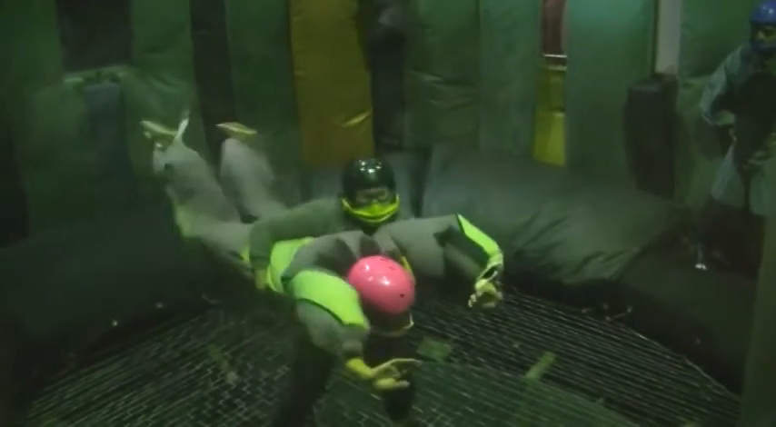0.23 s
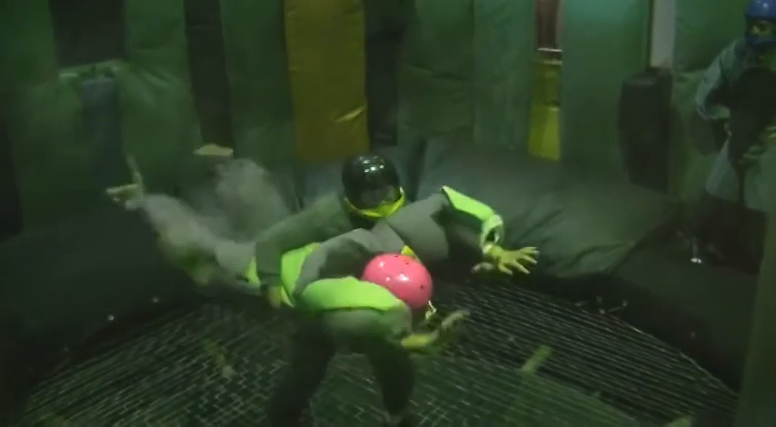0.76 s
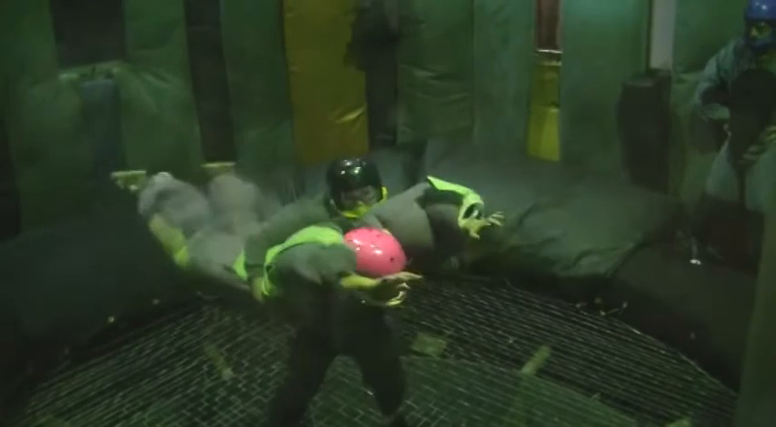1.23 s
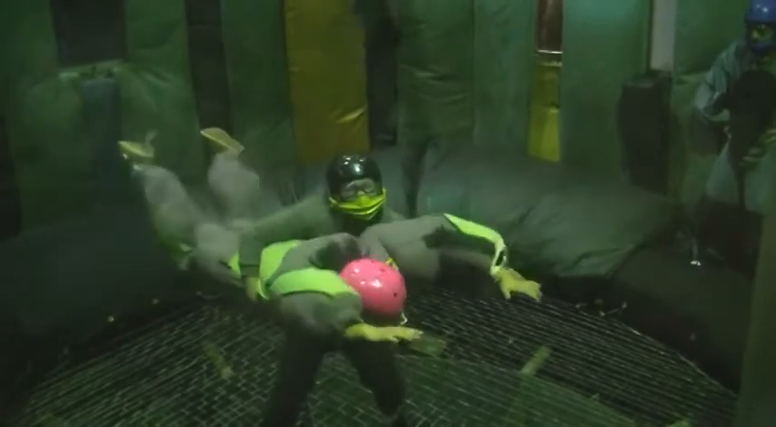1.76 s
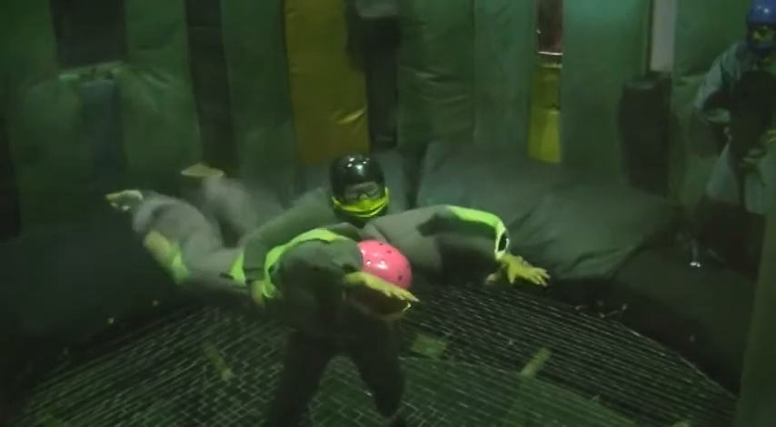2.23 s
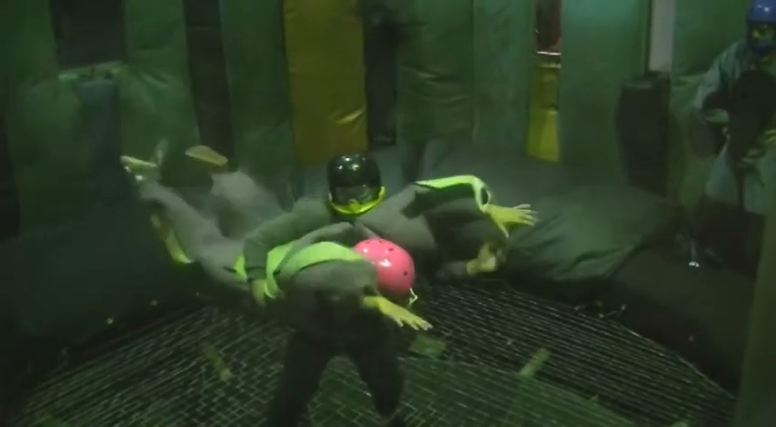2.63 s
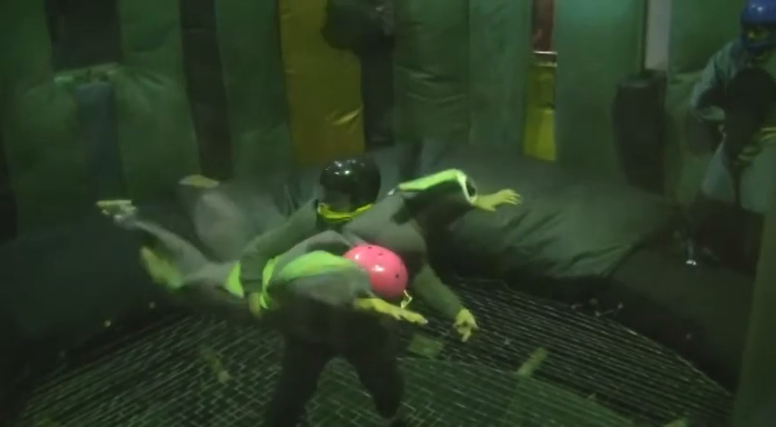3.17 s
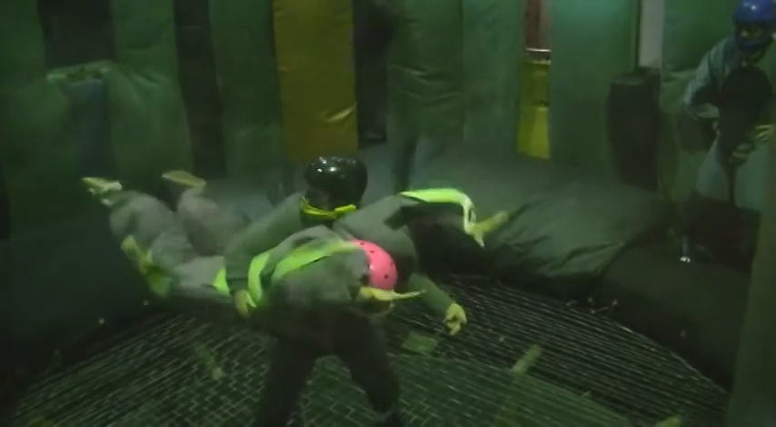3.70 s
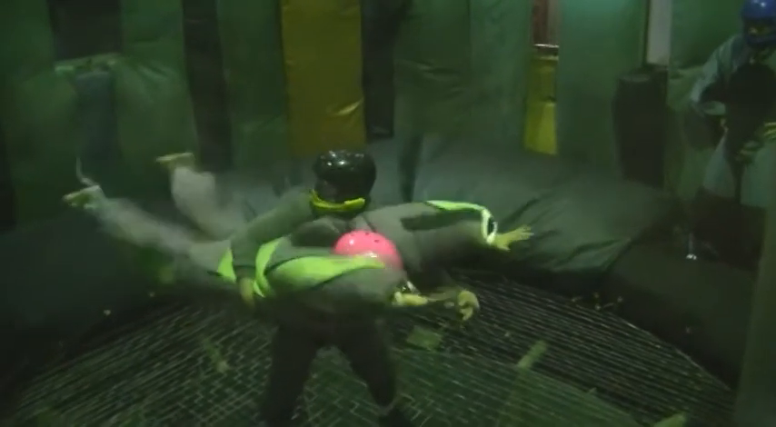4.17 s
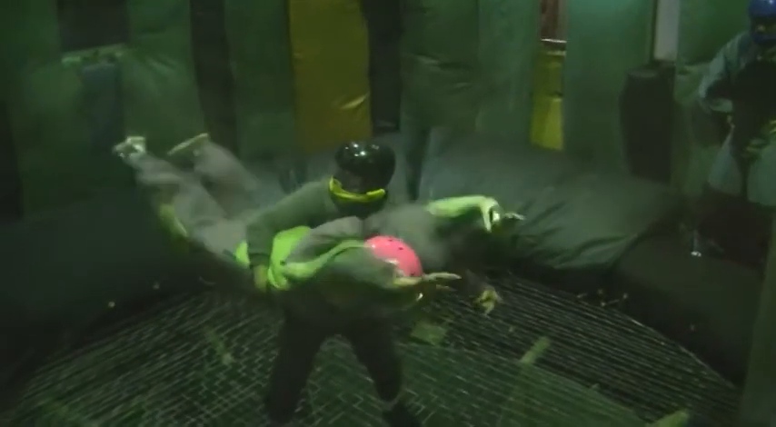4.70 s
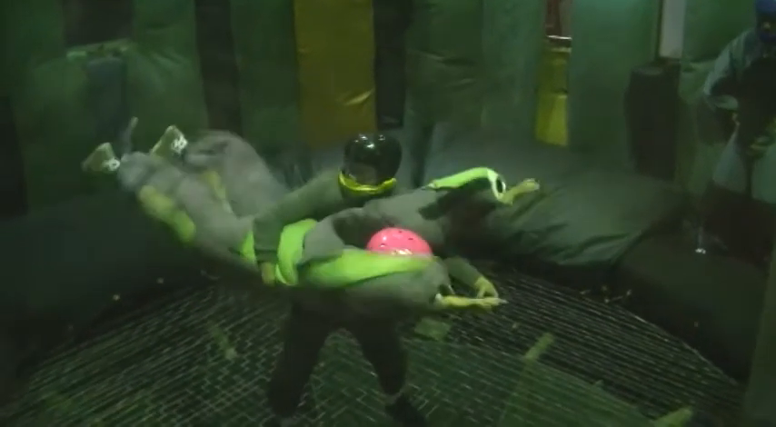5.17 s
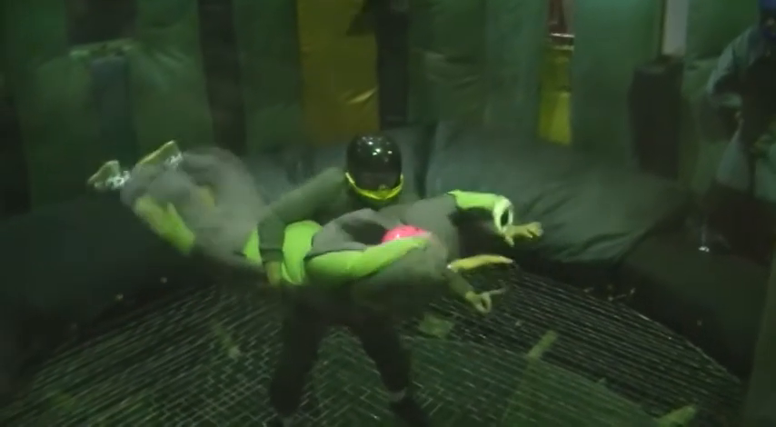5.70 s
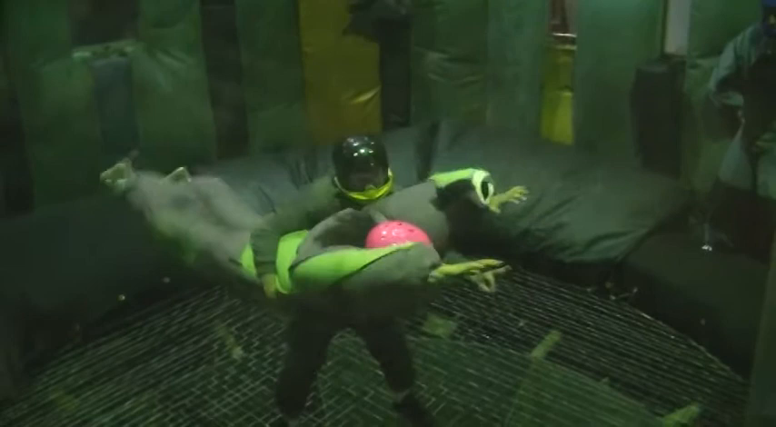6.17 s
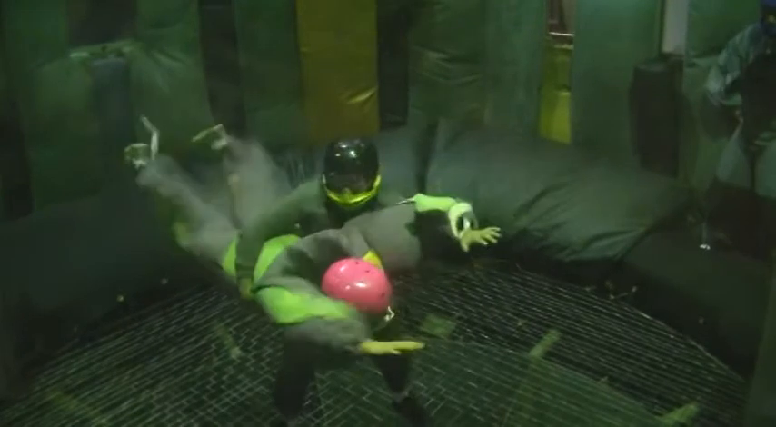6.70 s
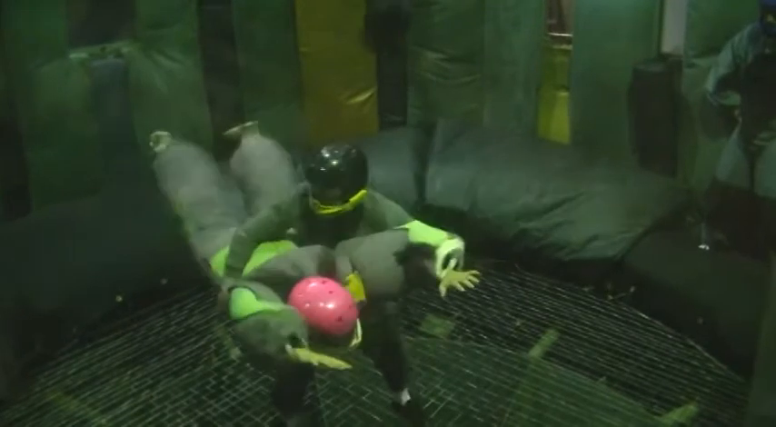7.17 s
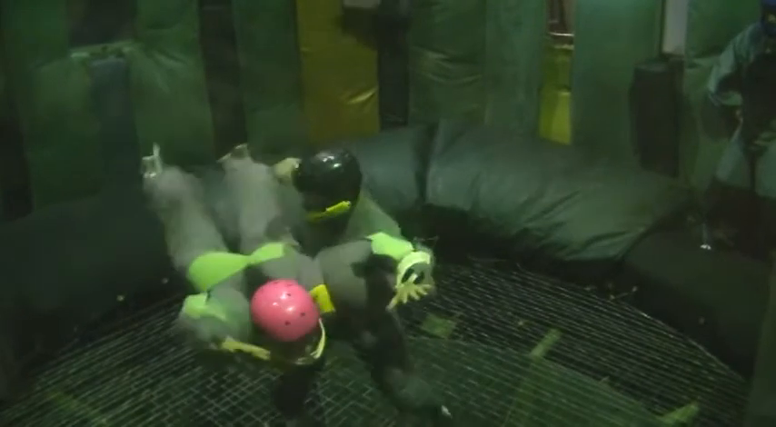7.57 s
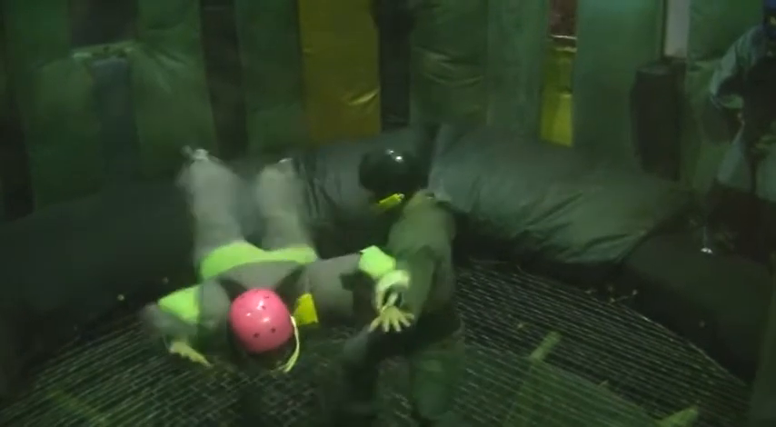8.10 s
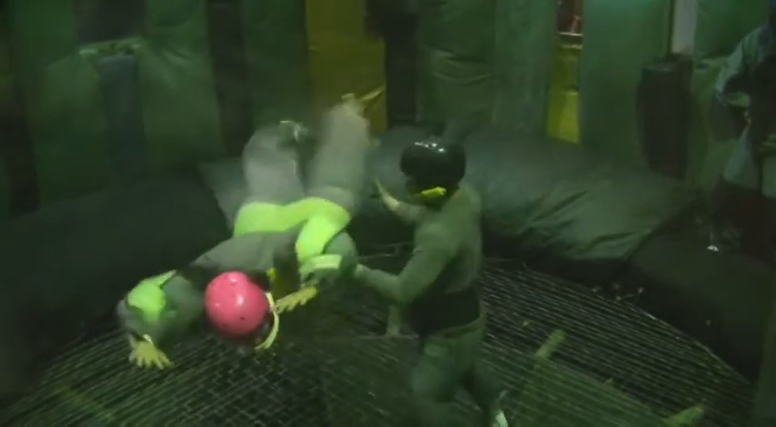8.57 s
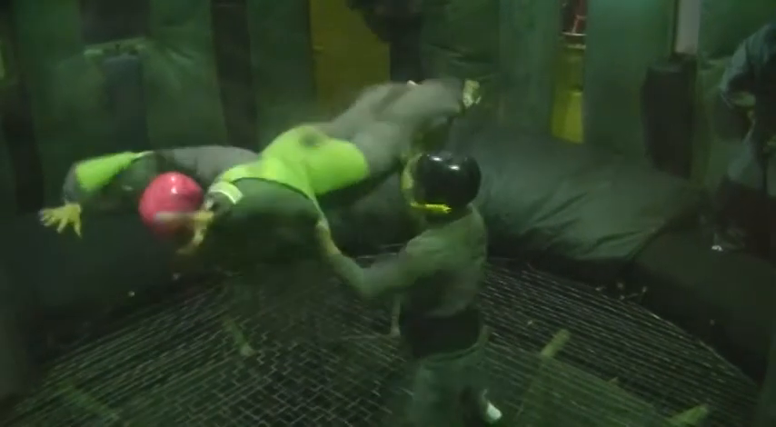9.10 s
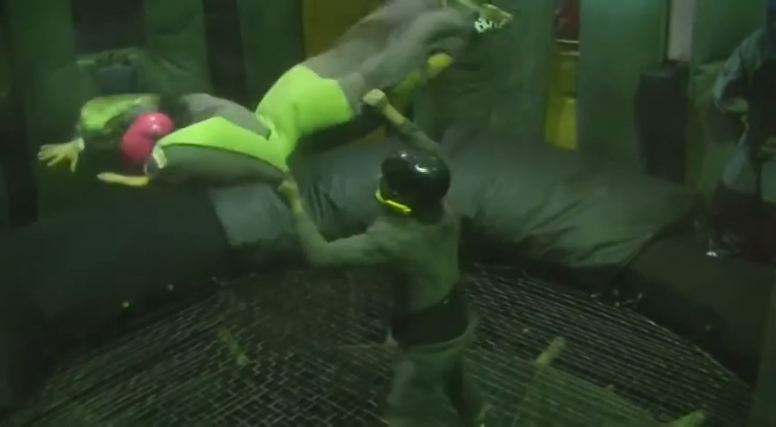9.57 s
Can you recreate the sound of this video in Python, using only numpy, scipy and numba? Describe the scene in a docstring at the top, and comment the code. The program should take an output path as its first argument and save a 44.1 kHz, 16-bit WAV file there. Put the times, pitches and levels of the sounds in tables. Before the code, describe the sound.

From 0 to about 10 seconds, the inside of a vertical wind tunnel is filled with an unbroken loud rush of air. A big fan gives a low, rough hum of several close harmonics, around 130 to 220 hertz strongest, that beat and waver irregularly several times a second over a faint deep drone. Around it a broad low roar, strongest from 200 to 500 hertz, surges and sags quickly, with hollow shaft resonances. A much softer hiss flutters above, rising slightly near 0, 3.5, 5.5, 7.3 and 8.6 seconds. One upper hum tone swells most around 5.6 seconds; roar and resonance thicken a little near 9, as the flyer is lifted. The sound is close, dense, compressed, nearly centred and dark, with little high treble. There are no voices, impacts or pauses, and it ends abruptly while still blowing.

```python
"""A big fan hums and throbs inside a vertical wind tunnel, driving a steady blast up through the floor net.
Its blade tones are harmonics of one rate, each partly scattered by eddies in the turbulent duct.
Noise keeps the shaft's air resonances ringing, roars low in surges, and hisses past the net and the flyers' suits.
A fast gain control turns the whole mix down as its power rises, so a swelling hum ducks the hiss."""
import sys
import numpy as np
from scipy import signal
from scipy.fft import rfft, irfft, next_fast_len
from scipy.io import wavfile
from numba import njit

SR = 44100
rng = np.random.default_rng(int(sys.argv[2]) if len(sys.argv) > 2 else 0)


def dump(signal):
    """Clip the signal to [-1, 1] and save it as 16-bit WAV at the path in sys.argv[1]."""
    limited = np.clip(np.atleast_2d(signal).T, -1, 1)
    pcm = np.round(limited * 32767).astype(np.int16)
    wavfile.write(sys.argv[1], SR, pcm)


N = 434385

TIME = np.arange(N) / SR
FREQS = np.fft.rfftfreq(next_fast_len(N), 1 / SR)
BLADE_HZ = 44.69  # blades passing per second


def fan():
    """The whole hum: a deep drone, three strong throbbing harmonics and the weaker blade tones around them."""
    third = fan_throb(index=1, level_db=0.0, share=0.05, scatter_hz=8.2, shift_hz=-1.5, wander=0.32, wander_hz=1.3)
    fourth = fan_throb(index=2, level_db=-0.35, share=0.09, scatter_hz=6.2, shift_hz=4.5, wander=0.6, wander_hz=1.1)
    fifth = fan_throb(index=3, level_db=0.0, share=0.087, scatter_hz=4.0, shift_hz=1.5, wander=1.21, wander_hz=1.2)
    return fan_drone() + fan_hum() + third + fourth + fifth


def fan_throb(index, level_db, share, scatter_hz, shift_hz, wander, wander_hz):
    """A strong blade tone: it swells slowly, eddies scatter a share of it, and its phase wanders (rms radians)."""
    # slow swells of the strongest harmonics, before the trim level_db:
    # (time [s], 3rd level [dB], 4th level [dB], 5th level [dB])
    throb = [(0.0, -18.5, -21, -19), (0.6, -24, -21, -21.5), (1.35, -19.5, -19, -21),
             (1.95, -21.5, -20.5, -19), (2.25, -24, -17.5, -17.5), (2.6, -21.5, -20, -18.5),
             (3.2, -22.5, -19, -20.5), (3.7, -22.5, -19, -26.5), (4.3, -20, -20, -19.5),
             (4.85, -19.5, -22.5, -22.5), (5.15, -21, -21, -23.5), (5.6, -28.5, -18.5, -13),
             (6.2, -22.5, -20, -28), (6.8, -20.5, -20, -18.5), (7.45, -19, -21, -27),
             (8.4, -24.5, -20.5, -17.5), (9.0, -21, -16, -19), (9.85, -27, -19, -22)]
    multiple = index + 2
    phase = wander * eddies(wander_hz)
    level = gain_of(curve(throb, index) + swells(multiple) + level_db)
    amplitude = scattered(share, scatter_hz, shift_hz) * np.exp(1j * phase)
    return level * blade_tone(multiple, amplitude)


def fan_drone(level_db=0.0):
    """The fundamental of the blade rate, a nearly pure tone."""
    # slow level of the deep fundamental: (time [s], level [dB])
    drone = [(0.0, -38), (0.39, -32.5), (1.62, -33.5), (1.82, -31), (3.84, -30.5), (4.97, -35),
             (8.13, -34.0), (9.31, -40), (9.85, -29.5)]
    level = gain_of(curve(drone, index=1) + level_db)
    return level * blade_tone(1, scattered(0.03, rate_hz=3.0))


def fan_hum():
    """The weaker blade tones, blurred by the turbulent air they cross."""
    # weaker harmonics, before their brief swells:
    # (multiple of the blade rate, level [dB], share scattered by turbulence [0-1], shift of that share [Hz])
    blade_tones = [(2, -34.5, .15, 0), (6, -25, 0.37, -1.2), (7, -25.5, 0.46, -1.2), (8, -30, .38, 0.6),
                   (9, -38.5, 0.6, 0), (10, -36, 0.8, 0), (12, -38, .9, 2)]
    hum = 0
    for multiple, db, share, shift_hz in blade_tones:
        level = gain_of(db + swells(multiple))
        hum = hum + level * blade_tone(multiple, scattered(share, rate_hz=5.0, shift_hz=shift_hz))
    return hum


def swells(multiple):
    """The brief level changes (dB) of one blade tone."""
    # one blade tone swells or fades: (time at the middle [s], multiple, change [dB], half length to 1/e [s])
    tone_swells = [(.11, 4, 5, 0.06), (.43, 4, -9, 0.029), (.87, 5, -12, 0.11), (1.06, 4, -11, .05),
                   (1.08, 5, 2, .08), (1.35, 6, 6, 0.11), (1.36, 5, -15, .15), (1.59, 4, 6, .08),
                   (1.65, 2, -7, .2), (1.73, 4, -11, 0.035), (1.802, 5, 2, .15), (1.917, 4, -12, .055),
                   (2.2, 6, 6, 0.064), (2.24, 3, -16, 0.066), (2.248, 7, 7.5, 0.063), (2.68, 5, -14, .05),
                   (2.75, 4, -15.5, 0.087), (2.85, 6, -11, 0.068), (3.15, 2, -11, 0.15),
                   (3.27, 5, -15, 0.042), (3.515, 4, -12, .076), (3.54, 5, -11, 0.059), (3.62, 8, 9.5, .11),
                   (3.74, 7, -17, .14), (3.95, 2, -4, .13), (3.95, 4, 4.5, .05), (3.98, 6, -4.5, 0.36),
                   (4.022, 3, -12, 0.061), (4.02, 5, 3, 0.052), (4.15, 4, -9, 0.065), (4.24, 5, 3.5, 0.043),
                   (4.31, 4, 0.5, 0.043), (4.43, 5, -17, 0.053), (4.546, 6, 4, .097), (4.68, 4, -11, 0.04),
                   (4.68, 5, 4.5, .1), (4.682, 2, -12, .21), (4.847, 8, 8.5, 0.48), (5.016, 5, -16, 0.084),
                   (5.08, 6, 6, .08), (5.35, 2, 4, .2), (5.363, 4, 5, 0.08), (5.5, 8, -7, .2),
                   (5.5, 6, -6.5, 0.07), (5.73, 6, 6, 0.089), (5.76, 4, -10, 0.035), (5.85, 2, -9, .22),
                   (6.06, 4, -13, 0.056), (6.4, 8, 10, 0.16), (6.503, 5, -10, 0.072), (6.57, 4, 5, 0.08),
                   (6.75, 2, 3.5, .41), (6.78, 4, -11, .094), (7.11, 3, -8.5, .12), (7.23, 4, -8, .06),
                   (7.5, 4, -8, 0.065), (7.54, 6, 12, 0.08), (7.876, 6, 7.5, 0.096), (8.0, 7, 4, 0.079),
                   (8.12, 4, -12.5, 0.064), (8.3, 3, 4.5, 0.046), (8.57, 4, -15, 0.041),
                   (8.6, 3, -5.5, 0.12), (8.72, 4, 2, 0.034), (8.94, 5, -15, .045), (8.96, 4, -10.5, .04),
                   (9.233, 7, -15, .13), (9.243, 6, 8, 0.09), (9.3, 3, -10, .05), (9.4, 2, 3.5, 0.16),
                   (9.432, 5, -5, .08), (9.5, 4, -16, .045), (9.525, 7, 9.5, 0.057), (9.676, 7, -16, .1),
                   (9.75, 8, 10.5, .18)]
    return sum(db * bump(s, half_s) for s, k, db, half_s in tone_swells if k == multiple)


def scattered(share, rate_hz, shift_hz=0):
    """Complex amplitude of a tone: a steady part plus a part that eddies blur and shift in pitch."""
    share = np.clip(share, 0, 1)
    steady = np.sqrt(1 - share) * np.exp(2j * np.pi * rng.random())
    blur = (eddies(rate_hz) + 1j * eddies(rate_hz)) * np.exp(2j * np.pi * shift_hz * TIME)
    return steady + np.sqrt(share / 2) * blur


def blade_tone(multiple, amplitude):
    """One sine harmonic of the blade rate; the size of the complex amplitude is its rms."""
    return np.sqrt(2) * (amplitude * np.exp(2j * np.pi * multiple * BLADE_HZ * TIME)).real


def shaft():
    """Turbulence keeps the air resonances of the shaft ringing; the strongest band swells or sinks briefly."""
    # air resonances of the shaft, before the brief changes: (frequency [Hz], width [Hz], level [dB])
    resonances = [(29.8, 1.0, -49.5), (59.4, 3, -47.5), (74.5, 3, -48), (105.2, 5.8, -33), (127, 17, -38.5),
                  (150.3, 3.5, -37), (186.5, 11, -28.5), (202.6, 8.7, -30), (226.3, 7.1, -33),
                  (250.5, 7.7, -26.5), (259.3, 14, -30), (300.6, 10, -28.5), (328, 24, -33),
                  (378.7, 14, -32.5), (423.5, 6.2, -38), (504, 20, -39.5)]
    # brief level changes of the strongest resonance band: (time at the middle [s], change [dB])
    band_changes = [(.17, 9.5), (.57, 3), (1.8, -1), (6.85, 4), (7.42, 2), (9.1, 7.5), (9.7, 5.5)]
    # the strongest resonance band: (low edge [Hz], high edge [Hz])
    strongest_band = (236, 266)
    power = 0
    for hz, width, db in resonances:
        peak = 1 / (1 + ((FREQS - hz) / width * 1.36) ** 2)
        power = power + (gain_of(db) * evened(peak)) ** 2
    gain = np.sqrt(power * N / 2)  # N / 2 makes each level the rms of its resonance
    in_band = (FREQS > strongest_band[0]) & (FREQS < strongest_band[1])
    change_db = sum(db * bump(s, rise_s=0.13) for s, db in band_changes)
    return noise(gain * ~in_band) + gain_of(change_db) * noise(gain * in_band)


def roar(buffet, level_db=0.06, buffet_db=0.12, rise_share=0.15, flutter_db=0.38, flutter_hz=14):
    """The broad low roar of the blast; large eddies make its body and its upper edge surge or sag."""
    # turbulence in the shaft: (frequency [Hz], relative level per Hz [dB])
    spectrum = [(20, -30), (38, -24), (52, -14), (68, -23), (78, -18.5), (88, -17.5), (160, -7),
                (200, -3.5), (288, -3.5), (325, -0.5), (375, 0), (470, -4.5), (545, -6.5), (620, -9.5),
                (1000, -23.5), (1500, -45.5), (3000, -80)]
    # slow level, before brief rises and the trim level_db: (time [s], level [dB])
    slow_level = [(0.0, -20.0), (0.64, -21), (0.83, -20), (3.45, -21), (3.64, -18.5), (3.94, -21),
                  (4.14, -19), (4.97, -19.5), (5.47, -21.5), (6.4, -19.5), (6.9, -19.5), (7.29, -18.5),
                  (7.53, -20.5), (8.18, -20), (8.37, -21.5), (8.91, -18), (9.41, -21), (9.85, -20.5)]
    # surges: (time at the middle [s], change of the body [dB], change of the upper edge [dB])
    surges = [(.26, 2.5, 3), (.52, -2, 1), (.63, -10, -1), (.8, 1, 1.5), (.95, -5, 0), (1.17, 1, 1),
              (1.5, -1, -2.5), (1.62, -6, 0.5), (2.08, 4, -0.5), (2.3, -1, 3), (2.44, 5.5, -1),
              (2.59, -4, 0), (2.87, 0, 2), (3.05, -2, -3), (3.22, 3, 3), (3.41, -4, 2), (3.69, 3, 0),
              (3.9, -3.5, 2), (4.03, -1, 3), (4.17, 0.5, 0), (4.27, 1.5, -3), (4.41, 5.5, 1.5),
              (4.97, 3.5, 1.5), (5.42, -5, -1), (5.6, -3, 2.5), (6.15, 2.5, 0.5), (6.56, 0.5, -2),
              (6.8, -1, 3), (6.91, -2, -0.5), (7.28, 3.5, -3.5), (7.56, -0.5, -2), (7.68, 3, 1),
              (7.85, -1, -2), (8.14, 4, 1), (8.31, -2, 1.5), (8.47, -1, 0), (8.61, 2.5, 1), (8.8, -2, -1.5),
              (9.03, -1.5, 2), (9.25, -0.5, 0), (9.36, 1.5, 2), (9.62, -3, 2.5), (9.8, 3.5, 2)]
    body_hz, upper_hz = 318, 570  # the body starts at the first, the upper edge at the second
    surge_s = 0.048  # half length of a surge, to 1/e
    swell_db = curve(slow_level, index=1) + buffet_db * buffet + rise_share * hiss_rises()
    body_db = upper_db = flutter_db * eddies(flutter_hz)
    for s, body_change_db, upper_change_db in surges:
        eddy = bump(s, surge_s)
        body_db = body_db + body_change_db * eddy
        upper_db = upper_db + upper_change_db * eddy
    whole = air(spectrum)
    high, upper = above(whole, body_hz), above(whole, upper_hz)
    low, body = whole - high, high - upper
    surging = low + gain_of(body_db) * body + gain_of(upper_db) * upper
    return gain_of(swell_db + level_db) * blade_chop(0.016) * surging


def hiss(buffet, level_db=1.5, buffet_db=-0.25, flutter_db=0.75, flutter_hz=24):
    """Air noise from all round the net: it rises briefly, and flapping cloth makes it flutter."""
    # air tearing past the net and the suits: (frequency [Hz], relative level per Hz [dB])
    spectrum = [(400, -18), (900, -6.5), (1080, -0.5), (1180, 3), (1320, -2.5), (1490, 0.5), (1650, -2),
                (1810, 1), (2230, -2), (2500, -2.5), (2800, -6), (3250, -6.5), (3800, -8.5), (4950, -15.5),
                (6400, -16), (9300, -29), (11500, -34), (15000, -47.5)]
    # slow level, before brief rises and the trim level_db: (time [s], level [dB])
    slow_level = [(0.0, -40.5), (1.23, -40.5), (2.41, -41), (3.2, -40.5), (4.1, -39), (4.53, -41),
                  (5.0, -40), (5.8, -42.5), (6.1, -39.5), (6.6, -41.5), (7.05, -40.5), (7.85, -41),
                  (9.85, -40)]
    swell_db = curve(slow_level, index=1) + hiss_rises()
    buffet_and_flutter_db = buffet_db * buffet + flutter_db * eddies(flutter_hz)  # buffets oppose the roar's
    return gain_of(swell_db + buffet_and_flutter_db + level_db) * blade_chop(0.036) * air(spectrum)


def hiss_rises():
    """Brief rises (dB) of the hiss: each builds at its own pace, and all fall equally fast."""
    # brief rises of the hiss, 0 dB leaves it unchanged: (time at the peak [s], change [dB], rise from 1/e [s])
    rises = [(.05, 2.2, .06), (.45, 0, 0.043), (.84, 1, .12), (1.29, 1, .07), (1.43, 1, .09),
             (1.93, 0.9, .1), (2.7, 1, .06), (2.92, 1, .07), (3.53, 1.5, .045), (3.865, 1.5, .06),
             (5.17, 1.5, .07), (5.54, 2.5, .05), (6.25, 0, .07), (7.12, 0.3, .05), (7.26, 2.2, .06),
             (8.13, 1.5, .07), (8.59, 2.1, .05), (8.99, 1, .09)]
    return sum(db * bump(s, rise_s, fall_s=0.092) for s, db, rise_s in rises)


def air(spectrum):
    """Diffuse air noise of unit rms, a little different at each ear."""
    # share of air noise that differs between the ears: (frequency [Hz], side minus mid [dB])
    width = [(60, -42), (560, -33), (750, -35.5), (1030, -15.5), (1350, -18.5), (2000, -23), (2600, -15),
             (4800, -15.5), (8000, -16), (12000, -30.5)]
    gain = colour(spectrum)
    mid, side = noise(gain), noise(gain * colour(width))
    return evened(np.array([mid + side, mid - side]))


def blade_chop(depth):
    """Gain with a small push at each passing blade; the ripple's rms is 0.91 of the depth."""
    return 1 + depth * blade_tone(1, 0.91)


def eddies(rate_hz):
    """Slow random drift of unit rms, fading above the given rate."""
    return evened(noise(1 / (1 + (FREQS / rate_hz) ** 2)))


def noise(gain):
    """Random noise with the given gain at every frequency."""
    real, imag = rng.standard_normal((2, len(FREQS)))
    return irfft(gain * (real + 1j * imag), next_fast_len(N))[:N]


def colour(points):
    """Gain at every frequency from (Hz, dB) points joined on a log axis."""
    hz, db = np.transpose(points)
    return gain_of(np.interp(np.log(FREQS + 1), np.log(hz + 1), db))


def above(x, edge_hz):
    """The part of a sound that lies above a frequency, without phase shift."""
    high_pass = signal.butter(4, edge_hz, "high", fs=SR, output="sos")
    return signal.sosfiltfilt(high_pass, x)


def curve(rows, index):
    """One column of a time table at every sample."""
    columns = np.transpose(rows)
    return np.interp(TIME, columns[0], columns[index])


def bump(s, rise_s, fall_s=None):
    """A bell-shaped rise to 1 at time s and a fall (as long as the rise unless given), timed to 1/e."""
    out = np.zeros(N)
    near = slice(max(round((s - 1) * SR), 0), round((s + 1) * SR))
    t = TIME[near] - s
    length_s = np.where(t < 0, rise_s, fall_s or rise_s)
    out[near] = np.exp(-np.minimum((t / length_s) ** 2, 20))
    return out


def gain_of(db):
    """Decibels to amplitude."""
    return 10 ** (np.asarray(db) / 20)


def evened(x):
    """Scales to unit rms."""
    return x / np.sqrt(np.mean(abs(x) ** 2) + 1e-20)


def scene():
    """Hum, shaft, roar and hiss together, mostly a little louder on the left."""
    # stereo balance: (frequency [Hz], left minus right [dB])
    balance = [(40, 0.5), (180, .7), (380, 0.7), (750, -0.5), (1020, -0.5), (1400, .3), (2700, .3),
               (3600, 1.0), (6500, 1), (9000, 0)]
    size = next_fast_len(N)
    buffet = eddies(5)  # shared by roar and hiss
    tilt = np.sqrt(colour(balance))  # half the difference goes to each side
    mix = fan() + shaft() + roar(buffet) + hiss(buffet)
    return irfft(rfft(mix, size) * np.array([tilt, 1 / tilt]), size)[:, :N]


@njit
def follow_power(power, start, attack, release):
    """A level detector that rises fast and sinks more slowly."""
    out, level = np.empty_like(power), start
    for i in range(len(power)):
        level += (power[i] - level) * (attack if power[i] > level else release)
        out[i] = level
    return out


def gain_control(x, threshold_db=-11.5, strength=0.39, attack_s=0.012, release_s=0.043):
    """Turns everything down quickly as the power rises (strength in dB per dB), and up again as it sinks."""
    power = (x ** 2).mean(0) / gain_of(threshold_db) ** 2
    level = follow_power(power, 0.68, 1 / (attack_s * SR), 1 / (release_s * SR))
    excess_db = 10 * np.log10(np.maximum(level, 0.5))  # the floor limits how far it turns up
    return x / gain_of(strength * excess_db)


def record(dry, makeup_db=0.32):
    """Fast gain control with make-up gain, very short end fades, then a steep low-pass."""
    levelled = gain_of(makeup_db) * gain_control(dry) * signal.windows.tukey(N, 4e-4)
    low_pass = signal.firwin(511, 15700, window=("kaiser", 9), fs=SR)  # edge in Hz
    return signal.oaconvolve(levelled, low_pass[None], "same")


dry = scene()
out = record(dry)
dump(out)
```